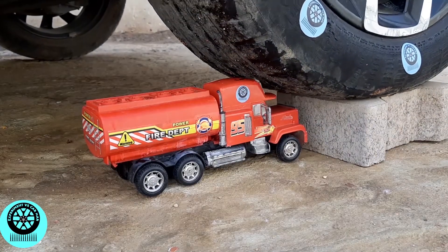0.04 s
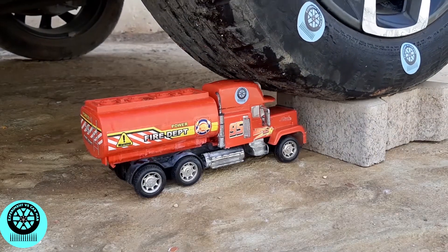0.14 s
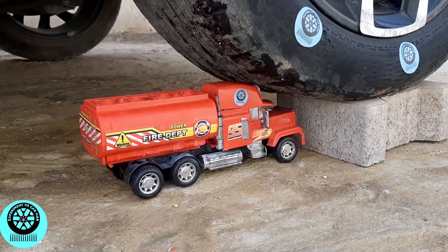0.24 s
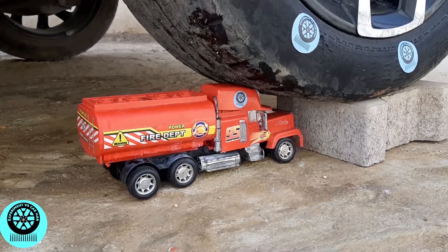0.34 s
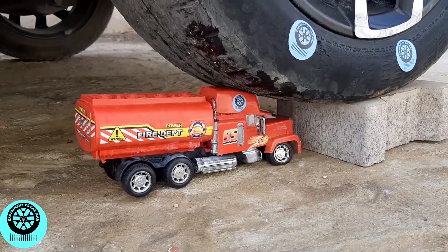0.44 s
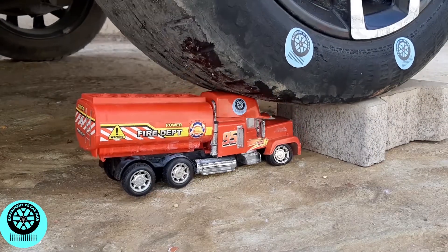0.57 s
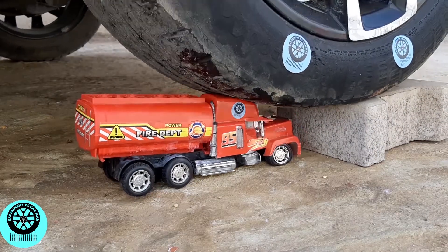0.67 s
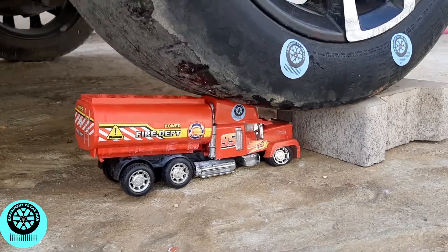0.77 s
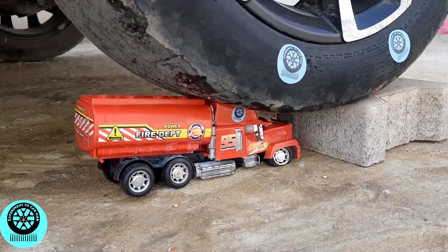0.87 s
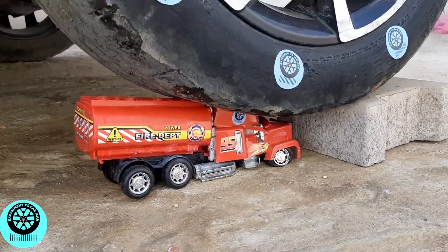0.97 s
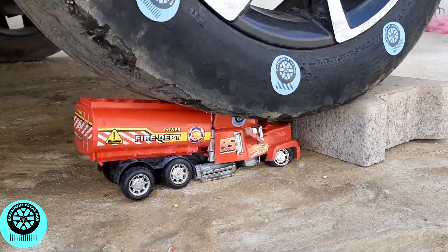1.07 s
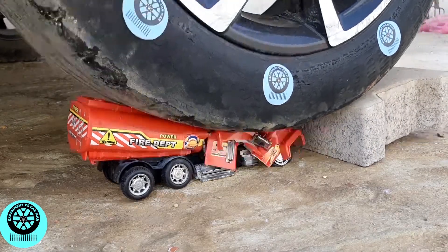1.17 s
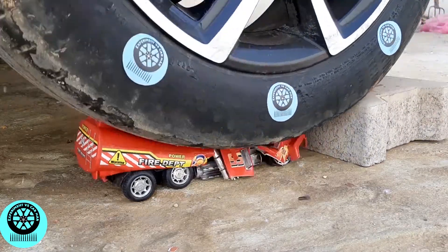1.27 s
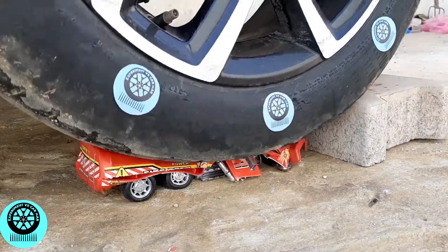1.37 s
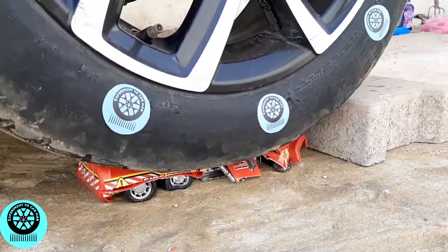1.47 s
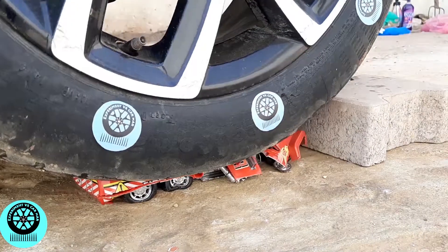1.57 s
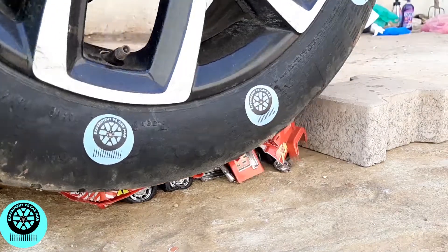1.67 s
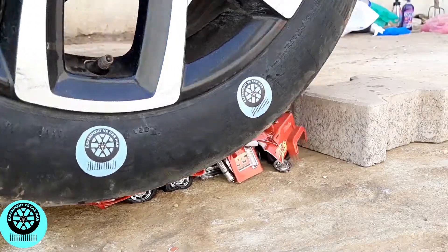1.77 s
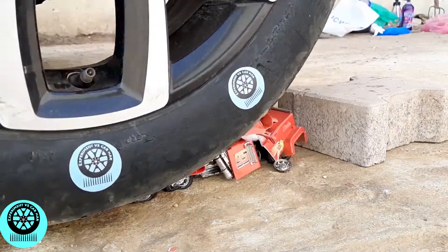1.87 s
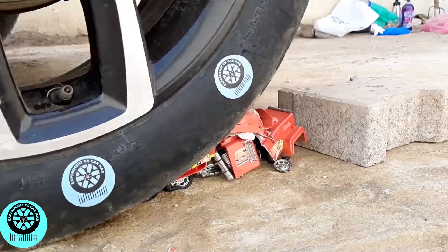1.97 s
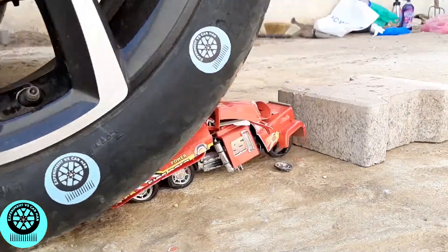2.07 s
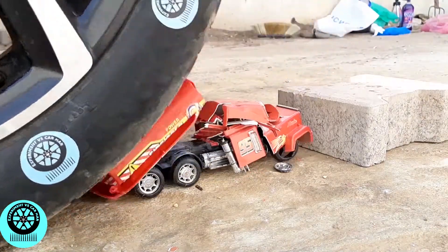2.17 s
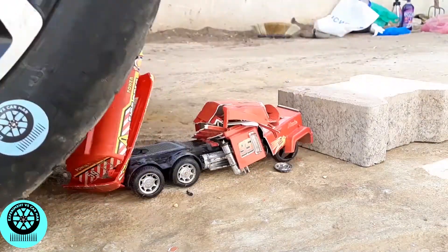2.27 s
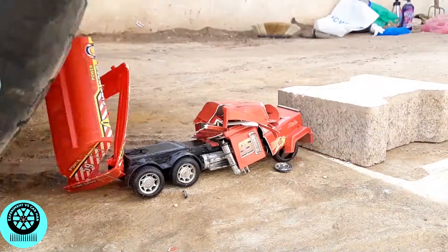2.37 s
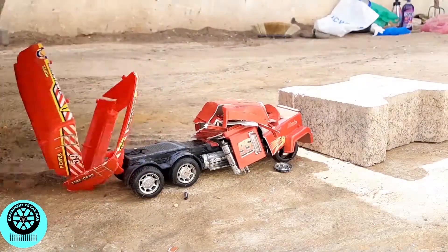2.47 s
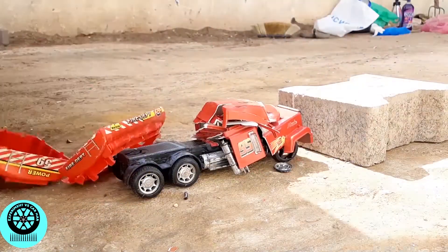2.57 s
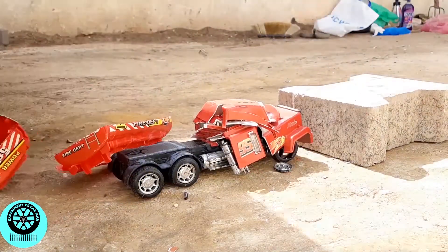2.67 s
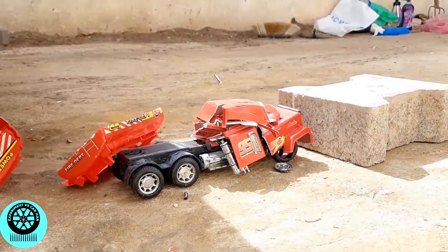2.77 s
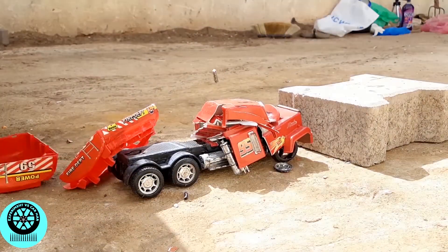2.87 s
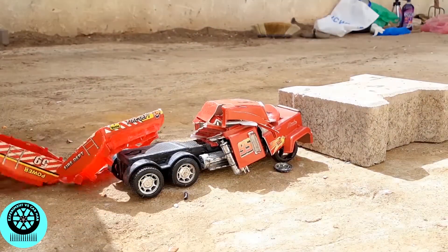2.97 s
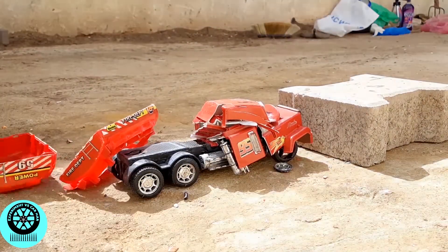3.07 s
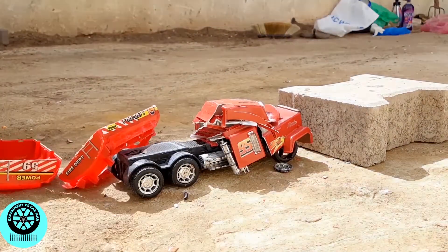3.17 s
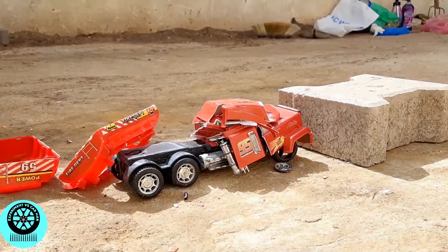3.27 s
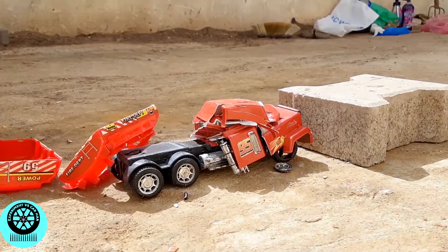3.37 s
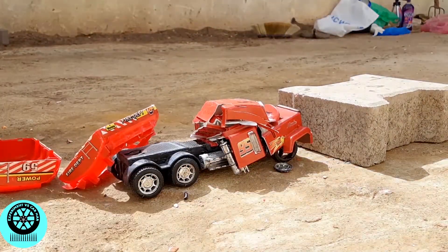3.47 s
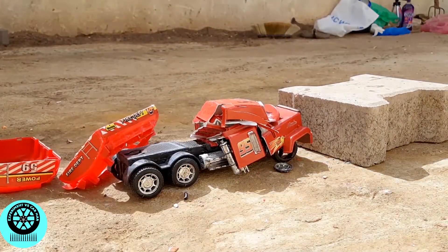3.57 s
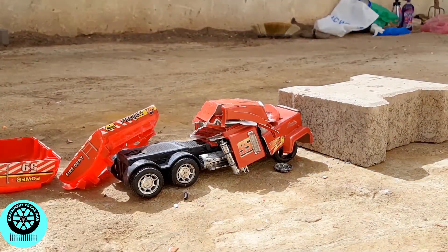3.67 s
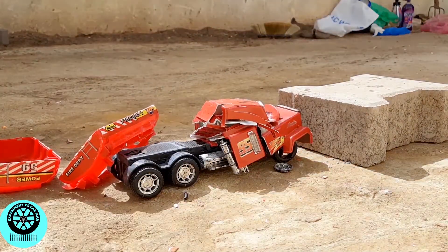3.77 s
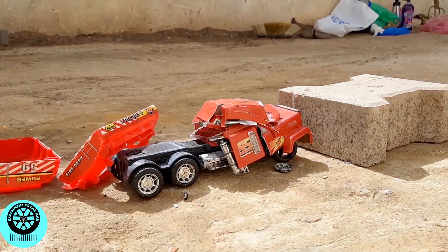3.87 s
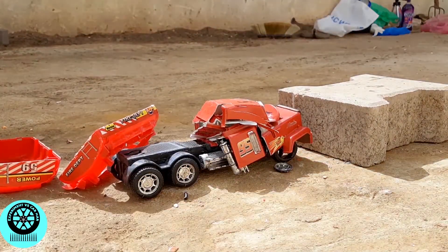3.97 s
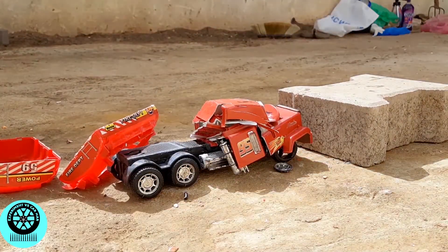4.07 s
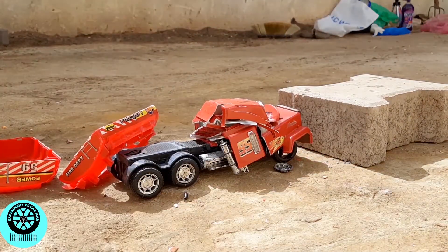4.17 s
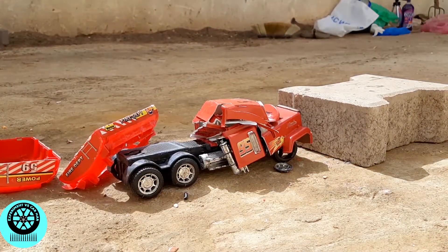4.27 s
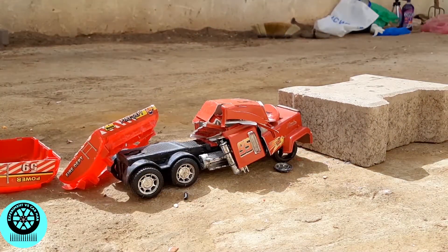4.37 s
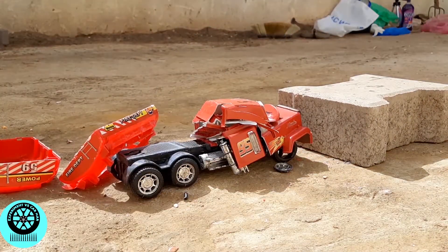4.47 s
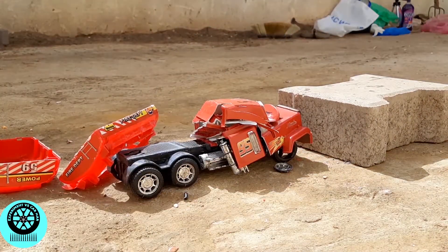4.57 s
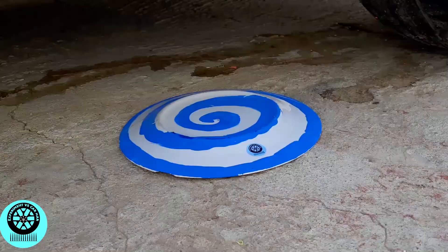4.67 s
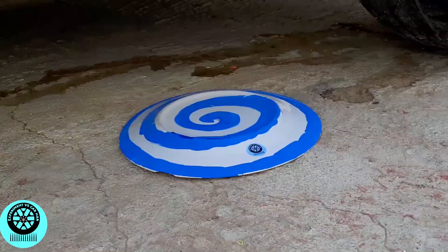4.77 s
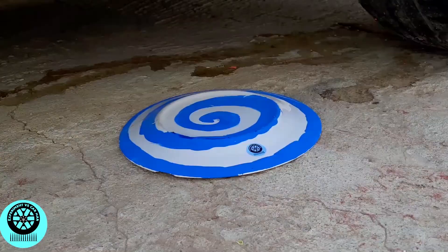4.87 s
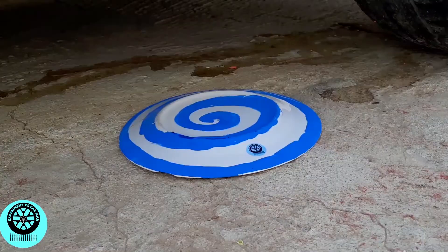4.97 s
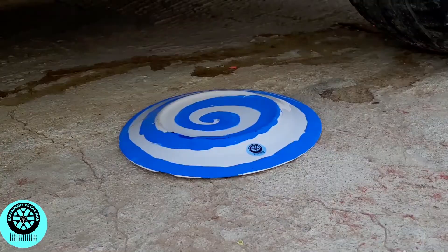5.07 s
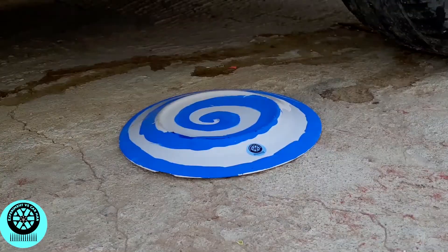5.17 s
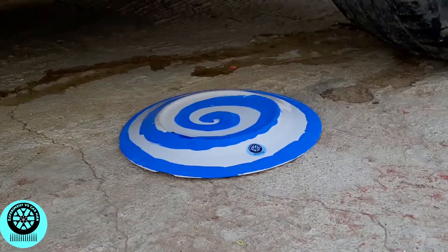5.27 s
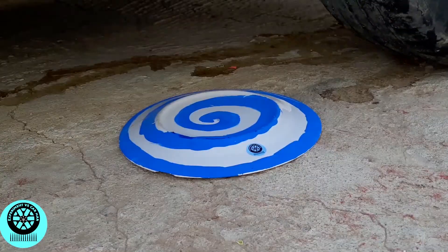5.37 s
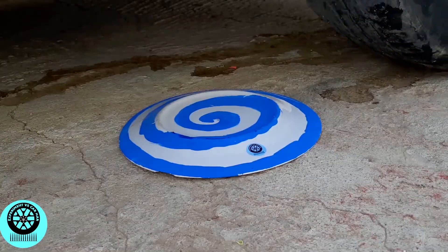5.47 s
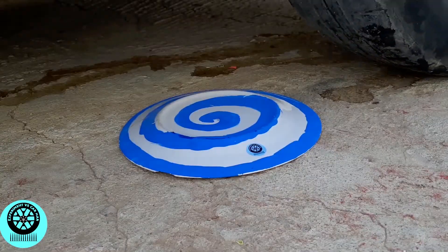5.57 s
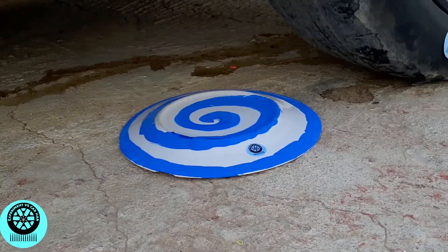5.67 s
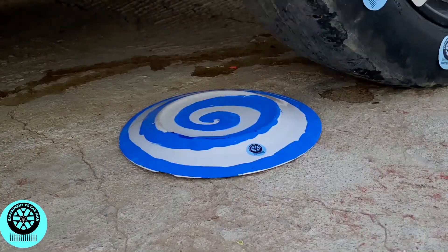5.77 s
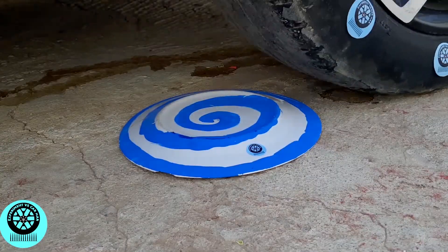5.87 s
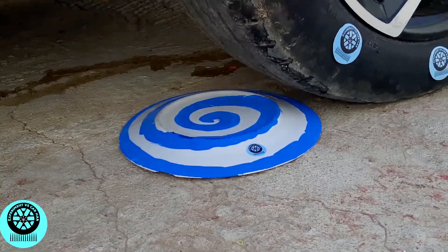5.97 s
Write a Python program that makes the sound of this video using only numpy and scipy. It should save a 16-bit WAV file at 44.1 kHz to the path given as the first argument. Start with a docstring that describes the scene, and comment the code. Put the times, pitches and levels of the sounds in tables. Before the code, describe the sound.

Close outdoor microphones catch loud, dry plastic snaps as a tyre loads a toy, with booming drops and a crackling collapse just after one second. Scattered cracks follow, then a sharp slap and small knocks as parts land. The quiet engine rumble remains; stones tick and pop under tread, a heavy clunk bumps, something squeaks briefly, and grit crunches again. Short yard echoes answer.

```python
"""A car creeps over a plastic toy tank in a concrete yard, close to two microphones, its engine idling.
The shell snaps (noise volleys ringing a few cycles), crackles (random grains) and caves in with a crunch.
The tyre booms as it drops (decaying sines) and pushes out puffs (low noise); loose parts smack the ground.
Grit grinds under the tread and stones pop; late on, the car gives dull clunks (noise bands) and a squeak.
The idle is wavering sines in coloured noise; sparse reflections of the yard answer breaks, stones and clunks."""
import sys
import numpy as np
from scipy import signal
from scipy.fft import rfft, irfft, next_fast_len
from scipy.io import wavfile
from scipy.ndimage import uniform_filter1d

SR = 44100
rng = np.random.default_rng(int(sys.argv[2]) if len(sys.argv) > 2 else 0)


def transcribe(u):
    """Save the signal u as a 16-bit wav file named by the first command-line argument.

    u: samples, shape (n,) or (channels, n), limited to [-1, 1]; the rate is SR.
    q: integer samples, one column per channel.
    """
    v = np.clip(np.atleast_2d(u).T, -1, 1)
    q = np.round(v * 32767).astype(np.int16)
    wavfile.write(sys.argv[1], SR, q)


N = 265923
TIME_S = np.arange(N) / SR

# Early echoes between car and ground: freq_hz, t60_s
EARLY_ECHO = [(200, 0.15), (1400, 0.049), (4000, 0.048), (12000, 0.028)]
# Late echoes of the yard: freq_hz, t60_s
LATE_ECHO = [(200, 1), (600, 0.18), (2000, 0.28), (6000, 0.18), (14000, 0.13)]
# Balance, added right and taken from left: time_s, lean_db
LEAN = [(0, 1.2), (4.3, 0.9), (5, 1.6)]
# Direction of the wheel: time_s, right_lag_s
BEARING = [(0, .00002), (.9, .00004), (1.3, .00005), (1.8, .00013), (2.1, .0001), (2.57, .00023),
           (3.7, .00022), (3.9, -.00022), (6, -.00014)]

# Running car: time_s, rumble_db, murmur_db
CAR_LEVELS = [(0, -39, -66.5), (.15, -49.5, -59.5), (.6, -48.5, -46), (1, -57.5, -56), (2, -55.5, -48),
              (2.4, -56.5, -61.5), (3.1, -59.5, -62.5), (3.45, -53, -55), (3.7, -56.5, -67),
              (4.15, -53, -64), (4.6, -59, -74.5), (4.8, -38.5, -51), (5.1, -53, -70), (5.55, -51, -66.5),
              (6.03, -50.5, -61)]
# Engine rumble spectrum: freq_hz, density_db (per Hz)
RUMBLE_SPECTRUM = [(20, -28), (35, -16.5), (52, 6), (70, 4), (100, 1.5), (135, 4), (180, -7.5),
                   (300, -16.5), (700, -47)]
# Engine murmur spectrum: freq_hz, density_db (per Hz)
MURMUR_SPECTRUM = [(90, -28), (190, 4), (300, 1), (500, -6), (900, -14.5), (2000, -12), (3000, -20),
                   (7500, -25.5), (9000, -32.5), (16000, -25)]
# Engine lines: freq_hz, level_db (re rumble_db of the car)
IDLE_LINES = [(54, -7.5), (97, -3), (237, -18)]
# Rubbing part of the car: freq_hz, level_db
SQUEAK_BANDS = [(2790, -56.5), (4700, -61)]
# Dull knocks of the car: start_s, level_db, boom_db, rattle_db (both re level), rattle_hz, knock_decay_s
CLUNKS = [(4.7319, -30, -6.5, -5, 1035, 0.014), (4.7596, -51, 7, 1, 1320, 0.023),
          (4.8075, -38, -2, -6, 1420, 0.0082), (4.867, -48.5, 8.5, -30, 2900, 0.038),
          (4.9208, -36.5, -6.5, 2.5, 1430, 0.012)]

# Tread on gritty concrete: time_s, level_db
TREAD_LEVEL = [(2.45, -61), (2.7, -54.5), (3.7, -60.5), (4.0, -48), (4.45, -56), (4.58, -61), (4.8, -63.5),
               (5.0, -74.5), (5.24, -63), (5.33, -54.5), (5.57, -48.5), (5.77, -60), (6.03, -48)]
# Grit spectrum: freq_hz, density_db (per Hz)
GRIT_SPECTRUM = [(410, -11), (700, -5.5), (922, -11), (1210, -7), (1750, -4.5), (2050, -3), (3240, -14),
                 (4610, -13), (7590, -12.5), (8880, -25), (13100, -19.5), (16000, -11)]
# Stones popping under the tread: start_s, ring_hz, level_db
STONES = [(0.0967, 2200, -51.5), (0.226, 4450, -51.5), (2.2666, 7000, -57.5), (3.613, 1550, -40.5),
          (3.9297, 1520, -37.5), (3.9454, 1530, -37.5), (3.9757, 1600, -33.5), (3.9988, 1710, -38.5),
          (4.0386, 1730, -33.5), (4.0827, 1565, -32), (4.605, 1900, -51), (5.268, 2100, -37.5),
          (5.415, 1520, -42.5), (5.526, 1520, -39.5), (5.5405, 1500, -32.5), (5.5579, 1650, -34.5),
          (5.6025, 2070, -36.5), (5.9087, 2460, -43.5)]

# Tyre drops as the toy gives way: start_s, level_db
JOLTS = [(.5385, -31), (.6145, -34), (.6595, -27.5), (1.152, -30), (1.187, -25), (1.284, -29), (1.585, -38),
         (1.861, -48), (2.164, -50)]
# Wheel and tyre modes, the longest being the air inside: freq_hz, level_db (re jolt), t60_s
TYRE_MODES = [(63, -2, .18), (87, -2, .21), (122, -3, .42), (168, -9, .55), (239, -2.5, 1.0),
              (277, -11, .17), (424, -17, .6)]

# Steady crackle of the loaded shell: time_s, level_db
STRAIN_LEVEL = [(0, -65), (.3, -56), (.85, -60), (1.25, -40.5), (1.52, -46), (1.62, -44.5), (1.75, -53.5),
                (1.88, -57.5), (1.95, -63), (2.07, -41), (2.22, -73)]
# Shell crackle spectrum: freq_hz, density_db (per Hz)
SHELL_SPECTRUM = [(180, -4.5), (300, -20.5), (550, 8), (1000, 2), (2100, -12), (3200, -7.5), (5000, -13),
                  (7400, -13.5), (8800, -23), (12500, -22.5), (16000, -17)]
# Hollow shell modes, rung by breaks: freq_hz, gain_db, t60_s
SHELL_MODES = [(597, -3, 0.042), (717, 3, .1), (865, 3, 0.02), (977, -1.5, .08), (1079, -2, 0.24),
               (1497, -4, .07), (2015, -3, 0.041), (2240, -26, 0.15), (2957, -6.5, .04)]
# Plastic breaks: start_s, ring_hz, level_db (body band), thud_db, snap_db (both re level), shatter (0-1)
BREAKS = [(0.2865, 1528, -12, -5, -1.5, 0.11), (0.336, 1380, -21.5, -18, -1.5, 0.93),
          (0.3425, 1450, -14.5, -4.5, -1.5, 0.25), (0.3486, 1438, -14, 0.5, -20.5, 0.12),
          (0.3841, 1786, -21, -1, 1.5, 0.45), (0.4055, 1410, -24.5, 5, -8, 0.36),
          (0.4144, 1435, -29.5, -9, 5.5, .3), (0.4237, 1450, -14.5, -6.5, -11, 0),
          (0.4272, 1494, -11.5, -1, -4, 0), (0.4364, 1400, -27, -2.5, 2, .05),
          (0.537, 920, -20.5, 2, 3.5, 0.77), (0.6131, 1130, -18.5, -3, 3, 0.87),
          (0.6588, 1099, -18, -3, 3.5, 0.78), (0.7827, 1487, -32.5, -0.5, -4, 0.5),
          (0.894, 1986, -10.5, -10, -4.5, .4), (0.9398, 690, -30.5, 4.5, -7.5, 0.32),
          (0.9546, 1100, -18.5, -5.5, -7, 0.63), (0.9613, 1770, -23.5, -18, -6, 0),
          (0.984, 3990, -20.5, -41, 6, .2), (1.0371, 900, -16, 0.5, -5, 0.5),
          (1.0493, 2523, -22.5, -7.5, 1, 0), (1.0894, 1932, -16.5, -0.5, 1.5, .45),
          (1.1058, 920, -12, -1.5, -8, 0.57), (1.1284, 2480, -23.5, -7, 4, 0.8),
          (1.132, 1480, -19.5, -5, -6.5, 0.6), (1.1396, 3910, -22.5, -12, 1, 1),
          (1.143, 1100, -18.5, -4.5, -1, 1), (1.154, 1107, -22, -9, 1.5, .7),
          (1.1665, 2500, -21.5, -1, 6.5, .7), (1.1845, 1070, -11.5, -9, -6, 0.29),
          (1.195, 615, -28, 10.5, -9.5, 0), (1.2154, 2030, -28, 6, 4, 0.55),
          (1.2409, 1060, -21, -9.5, 1, 0.59), (1.2583, 1560, -16.5, -16, -3, 0.77),
          (1.262, 1604, -35.5, 3.5, 7.5, 0.81), (1.2806, 3850, -12.5, -2, 3, 0),
          (1.2843, 2030, -21, -4, 5, 0.37), (1.305, 4660, -24.5, -13, 0.5, 0.8),
          (1.3546, 3420, -44.5, 2.5, 15.5, 0.85), (1.4115, 6620, -34, -2, 6.5, 0.81),
          (1.4296, 1940, -21.5, -11, 12.5, 0.073), (1.4747, 928, -25, -14, -8, 0.5),
          (1.49, 1917, -15, -6, -2, 0.41), (1.5687, 1750, -26.5, -15, -0.5, 0.13),
          (1.5837, 1050, -17.5, 0, 0.5, .5), (1.5908, 1520, -32, -7, 9, 0.86),
          (1.612, 1700, -32.5, 1.5, 4.5, .6), (1.671, 2130, -40, -4.5, 2, 0),
          (1.699, 2080, -45.5, -0.5, 9, 0.094), (1.832, 1950, -25.5, -9, -2.5, 0.29),
          (1.8472, 2393, -18, -7.5, -0.5, 0.5), (1.8627, 1727, -13, -18.5, -24, 0),
          (1.8923, 1070, -15, -3.5, 0.5, 0), (1.9667, 2270, -14.5, -17, -3, 0.1),
          (2.0129, 519, -40, 3.5, 0, 0.56), (2.0342, 4660, -36, -15, 8.5, 0.44),
          (2.0523, 1120, -30, -7, -7, .7), (2.0929, 2150, -38.5, -2, 11, 0.14),
          (2.1624, 1665, -29, -9.5, -0.5, 0.41), (2.1668, 1075, -26.5, -3.5, -9, .1)]
# Loose halves landing and settling: start_s, ring_hz, length_s, level_db, thud_db, snap_db, fizz_db
# (last three re level)
LANDINGS = [(2.5665, 4220, 0.0013, -20, -4.5, 4, -12.5), (2.647, 498, 0.0013, -47, 5, -10, -25),
            (2.7395, 6400, 0.001, -43.5, -28, 11.5, 0.5), (2.862, 1330, 0.006, -32, -13.5, -15.5, -29),
            (3.0374, 1640, 0.0064, -39, -4, -4, -18), (3.1377, 1510, 0.0019, -41.5, -10, -13, -24)]

OFF_TOY_S = 2.25  # wheel back on the concrete
SQUEAK_START_S, SQUEAK_LENGTH_S = 4.85, .08
CAVE_IN_S, CAVE_IN_DB = 1.125, -16.5
CAVE_RISE_S, CAVE_HOLD_S, CAVE_FADE_S = .015, .055, .02
AFTER_DB, AFTER_FADE_S = -33.5, .023  # crackle left behind by each break, re its level


def amp(db):
    """Decibels to gain."""
    return 10 ** (np.asarray(db) / 20)


def unit(x):
    """Scales to an rms of 1."""
    return x / np.sqrt(np.mean(x ** 2) + 1e-20)


def read(points, hz):
    """Reads a spectrum on a log-frequency axis."""
    freq_hz, value = np.transpose(points)
    return np.interp(np.log(hz + 1), np.log(freq_hz), value)


def curve(rows, column=1):
    """One column of a control table at every sample."""
    rows = np.array(rows)
    return np.interp(TIME_S, rows[:, 0], rows[:, column])


def add(mix, start_s, sound):
    """Mixes a sound in at start_s."""
    part = mix[:, max(round(start_s * SR), 0):][:, :sound.shape[-1]]
    part += sound[..., :part.shape[1]]


def band(x, lo_hz, hi_hz, order=3):
    """Causal band-pass."""
    edges_hz = [lo_hz, min(hi_hz, SR / 2 - 1)]
    return signal.sosfilt(signal.butter(order, edges_hz, "band", fs=SR, output="sos"), x)


def colour(x, points):
    """Gives x a spectrum, at an rms of 1."""
    size = next_fast_len(N)
    gain = amp(read(points, np.fft.rfftfreq(size, 1 / SR)))
    return unit(irfft(rfft(x, size) * gain, size)[..., :N])


def pair(x, alike):
    """Two independent rows become left and right with the given likeness."""
    alike = np.clip(alike, 0, 1)
    return np.array([x[0], alike * x[0] + np.sqrt(1 - alike ** 2) * x[1]])


def reverb(x, t60s, onset_s):
    """Sparse reflections of random sign, each band dying at its own speed."""
    size = SR // 2
    t_s = np.arange(size) / SR
    signs = rng.choice([-1., 1.], (2, size))
    taps = signs * (rng.random((2, size)) < .15) * (t_s > onset_s)
    hz, frame_s, z = signal.stft(taps, SR, nperseg=128)
    decay = np.exp(-np.log(1000) * frame_s / read(t60s, hz)[:, None])
    tail = signal.istft(z * decay, SR, nperseg=128)[1]
    tail /= np.linalg.norm(tail, axis=1, keepdims=True)
    return signal.oaconvolve(x, tail, axes=1)[:, :N]


def yard(x, late_db=-7.5):
    """Early and late echoes; three random reflection patterns fade in and out in turn."""
    out, count = np.zeros((2, N)), 3
    for k in range(count):
        # squared gains of the patterns sum to 1
        heard = x * np.sqrt(2 / count) * np.cos(np.pi * (3.3 * TIME_S + k / count))
        out += reverb(heard, EARLY_ECHO, onset_s=.003)
        out += amp(late_db) * reverb(heard, LATE_ECHO, onset_s=.012)
    return out


def engine(waver_hz=2.8):
    """Idling engine: low lines wavering together in a rumble, and a soft murmur above."""
    rumble = colour(pair(rng.standard_normal((2, N)), .93), RUMBLE_SPECTRUM)
    knots_s = np.linspace(0, TIME_S[-1], num=60)
    drift_hz = waver_hz * np.interp(TIME_S, knots_s, rng.standard_normal(len(knots_s)))
    lines = np.zeros(N)
    for hz, db in IDLE_LINES:
        turns = np.cumsum(hz + drift_hz) / SR
        lines += amp(db) * np.sqrt(2) * np.sin(2 * np.pi * turns)
    murmur = colour(pair(rng.standard_normal((2, N)), .78), MURMUR_SPECTRUM)
    low = amp(curve(CAR_LEVELS)) * (amp(-.5) * rumble + lines)
    return low + amp(curve(CAR_LEVELS, column=2)) * murmur


def squeak(width_hz=200):
    """Something on the car rubs: faint narrow noise bands that swell and fade."""
    out, swell = np.zeros((2, N)), np.hanning(round(SQUEAK_LENGTH_S * SR))
    for hz, db in SQUEAK_BANDS:
        noise = rng.standard_normal((2, SR // 4))
        rub = unit(band(noise, hz - width_hz / 2, hz + width_hz / 2, order=2))
        add(out, SQUEAK_START_S, amp(db) * swell * rub[:, :len(swell)])
    return out


def clunks(clatter_db=-13):
    """Heavy, soft blows: a boom, a knock and a brief rattle, all decaying noise bands."""
    out, t_s = np.zeros((2, N)), np.arange(SR // 3) / SR
    for start_s, db, boom_db, rattle_db, rattle_hz, decay_s in CLUNKS:
        noise = pair(rng.standard_normal((2, len(t_s))), .78)
        boom = amp(boom_db) * unit(band(noise, 56, 152, order=2))
        knock = unit(band(noise, 302, 610, order=2))
        knock += amp(rattle_db) * unit(band(noise, rattle_hz / 1.22, rattle_hz * 1.22, order=2))
        knock += amp(clatter_db) * unit(band(noise, 1700, 4500, order=2))
        blow = boom * np.exp(-t_s / (1.9 * decay_s)) + knock * np.exp(-t_s / decay_s)
        add(out, start_s, amp(db) * blow)
    return out


def tyre():
    """Each drop rings the wheel and the air in the tyre, a little out of step at the two microphones."""
    out, t_s = np.zeros((2, N)), np.arange(SR) / SR
    swell = 1 - np.exp(-t_s / .004)
    for start_s, db in JOLTS:
        for hz, mode_db, t60_s in TYRE_MODES:
            turns = hz * t_s + rng.random() + .4 * rng.random((2, 1))
            envelope = swell * np.exp(-np.log(1000) * t_s / t60_s)
            add(out, start_s, amp(db + mode_db) * envelope * np.sin(2 * np.pi * turns))
    return out


def shoves(puff_db=9.5, fade_s=.023):
    """Each drop of the tyre also pushes out a short, deep puff of air."""
    out, t_s = np.zeros((2, N)), np.arange(SR // 5) / SR
    for start_s, db in JOLTS:
        noise = pair(rng.standard_normal((2, len(t_s))), .2)
        puff = unit(band(noise, 55, 280, order=2))
        add(out, start_s, amp(db + puff_db) * puff * np.exp(-t_s / fade_s))
    return out


def crackle(level_db, spectrum, per_s, spread_db, hiss_db, patchy_db):
    """Countless grains of uneven size over a fine hiss, in clumps whose colour keeps shifting."""
    sizes = amp(spread_db * np.minimum(rng.exponential(1, N), 3))
    sizes *= rng.random(N) < per_s / SR
    grains = unit(pair(sizes * rng.standard_normal((2, N)), .2))
    hiss = amp(hiss_db) * rng.standard_normal((2, N))
    z = signal.stft(grains + hiss, nperseg=256)[2]
    patches = uniform_filter1d(rng.standard_normal(z.shape[1:]), size=7, axis=0)  # over frequency
    patches = unit(uniform_filter1d(patches, size=4, axis=1))  # over time
    clumps = unit(uniform_filter1d(rng.standard_normal(z.shape[2]), size=7))
    uneven = amp(patchy_db * (patches + .5 * clumps))
    rough = signal.istft(z * uneven, nperseg=256)[1][:, :N]
    return amp(level_db) * colour(rough, spectrum)


def strain():
    """Shell crackle in dB: the steady load, the cave-in, and a little after each break."""
    since_s = TIME_S - CAVE_IN_S
    cave_in = np.clip(since_s / CAVE_RISE_S, 0, 1)
    cave_in *= np.exp(-np.maximum(since_s - CAVE_HOLD_S, 0) / CAVE_FADE_S)
    kicks = np.zeros(N)
    for start_s, _, db, *_ in BREAKS:
        kicks[round(start_s * SR)] += amp(db + AFTER_DB) ** 2
    after = signal.lfilter([1], [1, -np.exp(-2 / (AFTER_FADE_S * SR))], kicks)
    power = amp(curve(STRAIN_LEVEL)) ** 2 + (amp(CAVE_IN_DB) * cave_in) ** 2 + after
    return 10 * np.log10(power)


def crunch():
    """The shell crackles while it bears the wheel; after that the tread grinds grit."""
    on_toy = np.clip(.5 + (OFF_TOY_S - TIME_S) / .1, 0, 1)
    shell = crackle(strain(), SHELL_SPECTRUM, per_s=1300, spread_db=4, hiss_db=-4, patchy_db=3.4)
    grit = crackle(curve(TREAD_LEVEL), GRIT_SPECTRUM, per_s=600, spread_db=5, hiss_db=1, patchy_db=3)
    return on_toy * shell + (1 - on_toy) * grit


def fracture(ring_hz, length_s, db, thud_db, snap_db, fizz_db, lag_s, shard_db=6, shard_q=8):
    """One hard break runs on as a volley of tiny ones, which ring the piece for a few cycles."""
    t_s = np.arange(SR // 25) / SR
    envelope = np.exp(-(t_s / np.clip(length_s, .0004, .006)) ** 1.5)
    volley = rng.standard_normal((2, len(t_s))) * envelope
    volley[0, 0] += .8 * np.linalg.norm(volley[0])  # the opening break
    ring = signal.lfilter(*signal.iirpeak(ring_hz, shard_q, SR), volley)
    rung = volley + amp(shard_db) * ring
    low, high = pair(rung, .92), pair(rung, .55)
    body_hz = np.interp(thud_db, [-22, -10], [1200, 700])  # small pieces: little thud, higher body
    sound = amp(thud_db) * unit(band(low, 410, 888, order=2))
    sound += unit(band(low, body_hz, 2500))
    sound += amp(snap_db) * unit(band(high, 2500, 7630))
    sound += amp(fizz_db) * unit(band(high, 10330, 14000, order=2))
    sound[1] = np.interp(t_s - lag_s, t_s, sound[1], left=0)
    over_5_ms = np.sqrt(.005 / t_s[-1])  # levels count as rms over 5 ms
    return over_5_ms * amp(db) * sound


def strike(events):
    """Plays rows of small fractures: the direct sound and the share sent into the yard."""
    direct, sent = np.zeros((2, 2, N))
    for start_s, *piece, echo_db in events:
        sound = fracture(*piece, lag_s=np.interp(start_s, *np.transpose(BEARING)))
        add(direct, start_s, sound)
        add(sent, start_s, amp(echo_db) * sound)
    return np.array([direct, sent])


def sand(count=30, against_tread_db=-8, spread_db=8, lowest_hz=2300, octaves=1.4):
    """Fine grains burst at random under the tread; rows like STONES."""
    when, pitch, size = rng.random((count, 3)).T
    start_s = OFF_TOY_S + (TIME_S[-1] - OFF_TOY_S) * when
    db = np.interp(start_s, *np.transpose(TREAD_LEVEL)) + against_tread_db + spread_db * size ** 2
    return list(zip(start_s, lowest_hz * 2 ** (octaves * pitch), db))


def stone_sound(ring_hz, db, middling_hz=1500, bright_db_per_octave=10.5):
    """A smaller stone rings higher and sounds brighter; it has little body and a moderate echo."""
    bright_db = bright_db_per_octave * np.log2(ring_hz / middling_hz)
    length_s, thud_db, echo_db = .0011, -19.5, -5
    return ring_hz, length_s, db, thud_db, bright_db - 9.5, bright_db - 12, echo_db


def splinters(count=100, above_db=3, spread_db=10, lowest_hz=900, octaves=3.6, thud_db=-8, snap_db=(-7, 4)):
    """Small pieces give way at random while the shell is loaded; rows like BREAKS."""
    when, pitch, size, shatter = rng.random((count, 4)).T
    first_s, last_s = BREAKS[0][0], BREAKS[-1][0]
    start_s = first_s + (last_s - first_s) * when
    db = np.interp(start_s, *np.transpose(STRAIN_LEVEL)) + above_db + spread_db * size ** 2
    ring_hz = lowest_hz * 2 ** (octaves * pitch)
    snaps_db = np.interp(pitch, [0, 1], snap_db)
    return list(zip(start_s, ring_hz, db, np.full(count, thud_db), snaps_db, shatter))


def break_sound(ring_hz, db, thud_db, snap_db, shatter, fizz_per_snap=.55):
    """The more a piece shatters, the longer, fizzier and more echoing its break."""
    length_s = np.interp(shatter, [0, 1], [.0017, .003])
    fizz_db = np.interp(shatter, [0, 1], [-13, .5]) + fizz_per_snap * snap_db
    echo_db = np.interp(shatter, [0, 1], [-12.5, 1])
    return ring_hz, length_s, db, thud_db, snap_db, fizz_db, echo_db


def shell_ring(x):
    """The hollow shell rings on briefly in its own modes."""
    out = np.zeros_like(x)
    for hz, db, t60_s in SHELL_MODES:
        q = hz * t60_s * np.pi / np.log(1000)
        out += amp(db) * signal.lfilter(*signal.iirpeak(hz, q, SR), x)
    return out


def breaking(landing_echo_db=-10):
    """The toy breaks and rings, its loose parts land, stones pop: direct sound and yard share."""
    stones = strike([(s, *stone_sound(*row)) for s, *row in list(STONES) + sand()])
    parts = strike([(*row, landing_echo_db) for row in LANDINGS])
    toy = strike([(s, *break_sound(*row)) for s, *row in list(BREAKS) + splinters()])
    direct, sent = toy + parts + stones
    return direct + shell_ring(toy[0]), sent


def scene():
    """Everything at the two microphones; the car is a little to the right."""
    bed = engine() + squeak() + crunch() + tyre() + shoves()
    knocks = clunks()
    direct, sent = breaking()
    balance = amp(np.outer([-1, 1], curve(LEAN)))
    return (bed + knocks + direct + yard(sent + knocks)) * balance


def record(dry, dip_hz=8950, dip_q=3.4, dip_depth=.63, edge_hz=16200):
    """The microphone has a dip in the treble; the recorder's limiter rounds off the tallest peaks; then the
    band limit."""
    coloured = dry - dip_depth * signal.lfilter(*signal.iirpeak(dip_hz, dip_q, SR), dry)
    rounded = .9 * coloured / (1 + coloured ** 4) ** (1 / 4)
    lowpass = signal.firwin(255, edge_hz, window=("kaiser", 9), fs=SR)
    return signal.oaconvolve(rounded, lowpass[None], "same")


dry = scene()
out = record(dry)
transcribe(out)
```